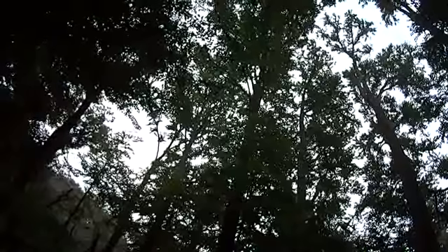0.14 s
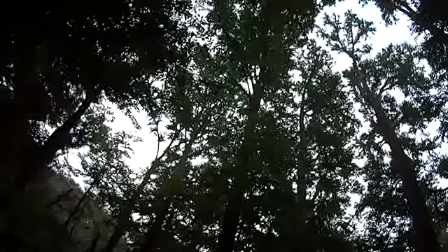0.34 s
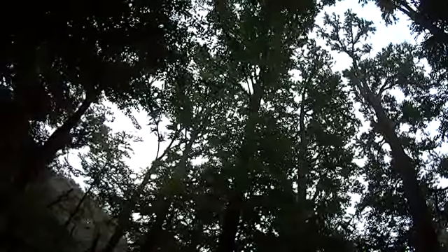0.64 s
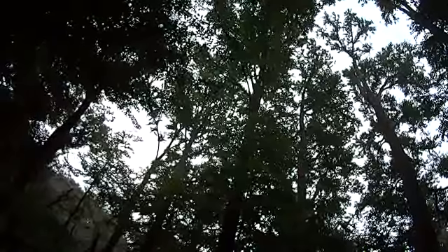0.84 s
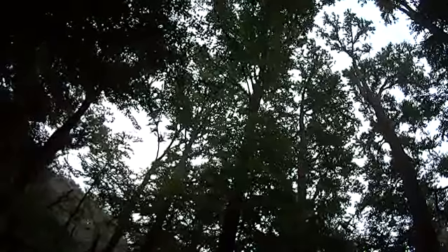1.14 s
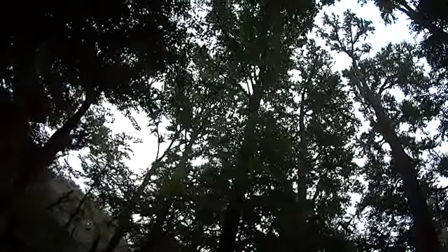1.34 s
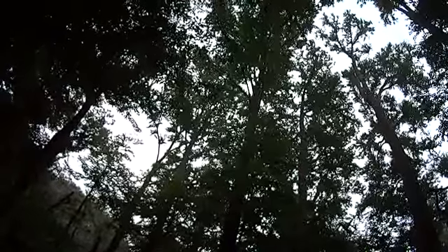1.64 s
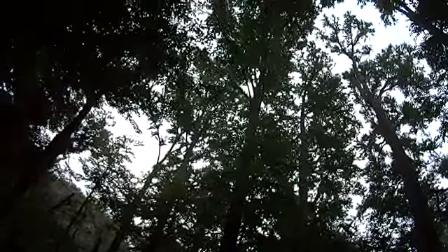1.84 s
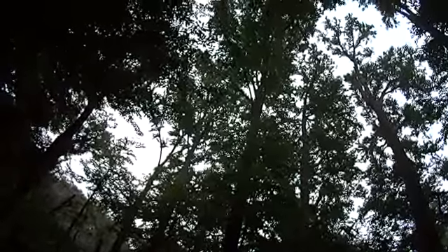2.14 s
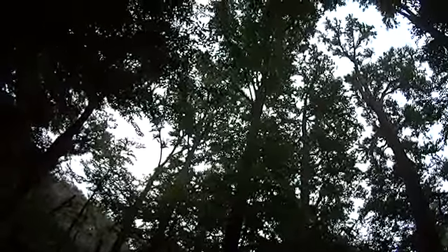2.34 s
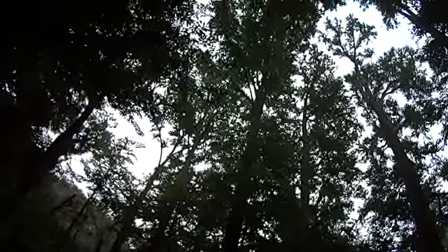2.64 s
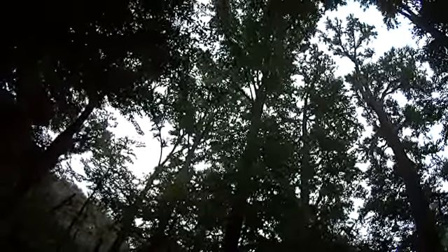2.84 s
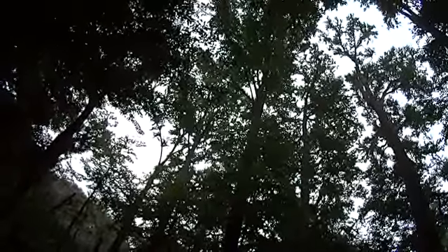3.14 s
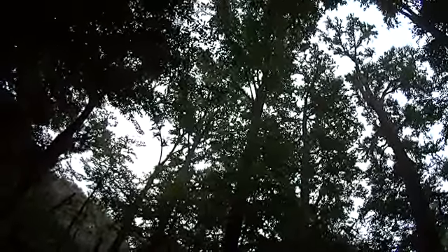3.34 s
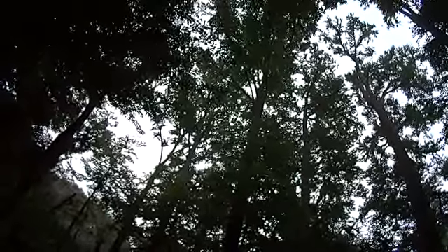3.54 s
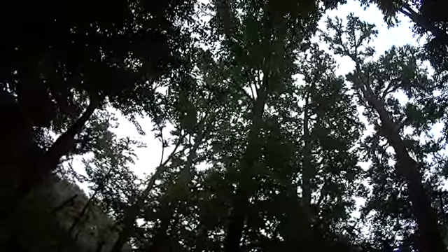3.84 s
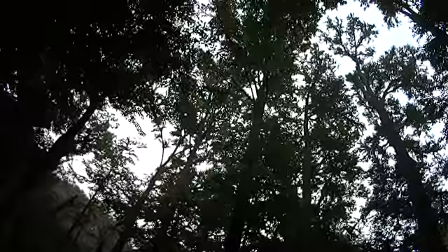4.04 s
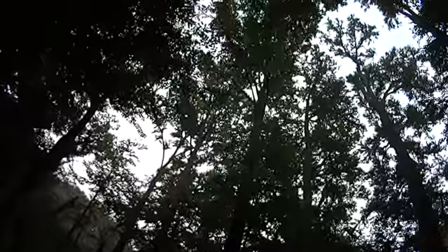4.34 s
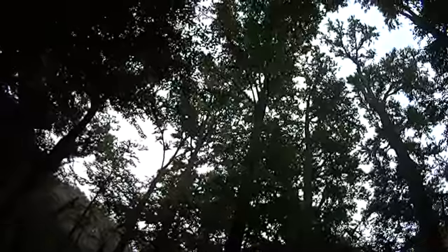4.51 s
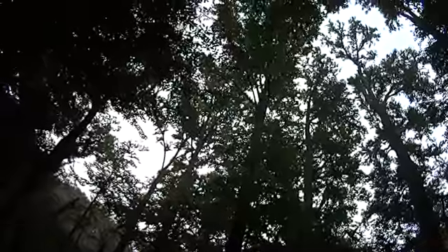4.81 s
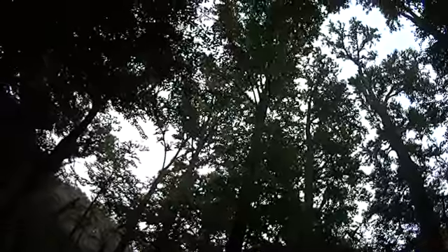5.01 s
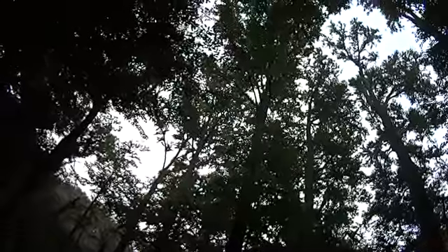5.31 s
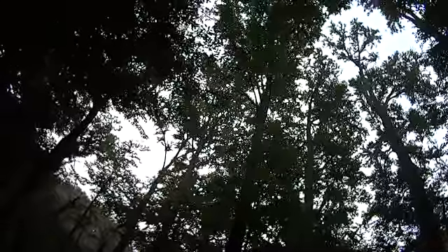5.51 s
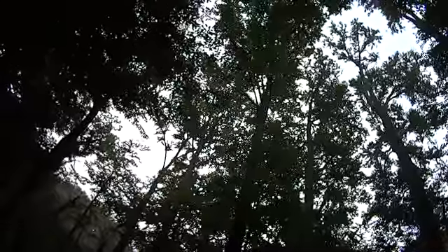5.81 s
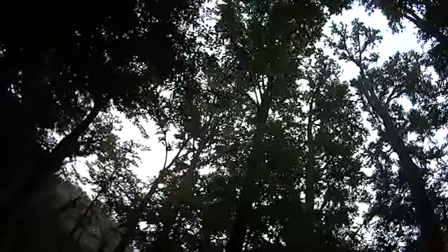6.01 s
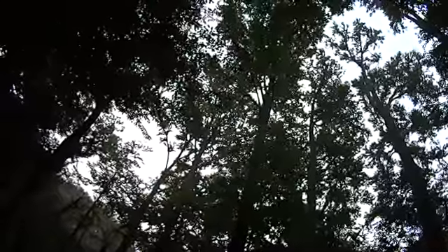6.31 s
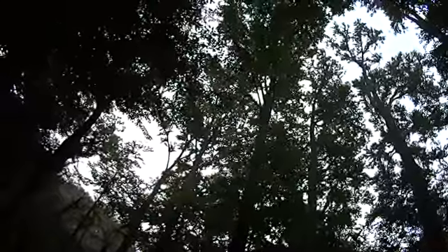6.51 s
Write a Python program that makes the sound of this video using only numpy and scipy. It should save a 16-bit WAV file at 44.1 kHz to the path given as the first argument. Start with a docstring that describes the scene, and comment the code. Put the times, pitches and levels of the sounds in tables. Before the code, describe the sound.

Short harsh woodpecker chirps echo through a wood, with faint arched notes from another bird, an insect drone and far traffic rumble.

```python
"""Distant traffic, a wavering hum and an insect chorus fill a wood; two dull thumps and a twig tick sound.
High in the trees a small bird or squirrel scolds in harsh chirps, slowly, then in a quick burst: an uneven
vibration filtered by throat and beak. Farther off a larger bird calls in arched notes, and two nearer
notes follow on the left. One cricket peeps faintly. Leaves shade the direct sound of the chirps, and the
trunks throw back every chirp and note."""
import sys
import numpy as np
from scipy import signal
from scipy.fft import rfft, irfft
from scipy.io import wavfile
from scipy.ndimage import uniform_filter1d

SR = 44100
rng = np.random.default_rng(int(sys.argv[2]) if len(sys.argv) > 2 else 0)


def log_audio(samples):
    """Write samples as a 16-bit WAV file to the path given in sys.argv[1]."""
    # one column per channel
    frames = np.atleast_2d(samples).T
    # limit to full scale, then quantise
    limited = np.clip(frames, -1, 1)
    pcm = np.round(limited * 32767).astype(np.int16)
    wavfile.write(sys.argv[1], SR, pcm)


N = 293706


def amp(db):
    """Amplitude ratio of a level in decibels."""
    return 10 ** (np.asarray(db) / 20)


def unit_rms(x):
    """Normalisation to an rms of 1."""
    return x / np.sqrt(np.mean(x ** 2) + 1e-20)


def spectrum_at(points, hz):
    """Interpolation of a spectrum along a logarithmic frequency axis."""
    f, value = np.transpose(points)
    return np.interp(np.log(hz + 1), np.log(f + 1), value)


def follow(rows):
    """Linear interpolation of timed columns at every sample."""
    times, *columns = np.transpose(rows)
    return [np.interp(np.arange(N) / SR, times, column) for column in columns]


def add(mix, start_s, sound):
    """Superposition: a sound adds to the mix from start_s on."""
    at = round(start_s * SR)
    part = mix[..., at:at + sound.shape[-1]]
    part += sound[..., :part.shape[-1]]


def pan(left_db):
    """Two gains whose level difference places a sound to one side."""
    return amp(np.array([[left_db / 2], [-left_db / 2]]))


def wander(count, hz):
    """Random fluctuation of rms 1: noise low-passed at hz."""
    b, a = signal.butter(2, hz / (SR / 2))
    return unit_rms(signal.lfilter(b, a, rng.standard_normal(count + 4000))[4000:])


def resonance(hz, centre_hz, width_hz):
    """Lorentzian response: the gain halves at half a width from the centre."""
    return 1 / (1 + ((hz - centre_hz) / (width_hz / 2)) ** 2)


def stereo_noise(level_db, coherence, left_db, patchy_db):
    """Partly coherent noise in two channels, its spectrum rippled by drifting patches."""
    frames, hz = N // 512 + 5, np.fft.rfftfreq(2048, 1 / SR)
    a, b, c, d, patches = rng.standard_normal((frames, len(hz), 5)).T
    patches = unit_rms(uniform_filter1d(uniform_filter1d(patches, size=16, axis=0), size=8, axis=1))
    alike = coherence(hz)[:, None]
    left = a + 1j * b
    right = alike * left + np.sqrt(1 - alike ** 2) * (c + 1j * d)
    colour = amp(level_db(hz)[:, None] + patchy_db * patches)
    balance = amp(np.array([[.5], [-.5]]) * left_db(hz))[..., None]
    spectra = np.array([left, right]) * colour * balance
    return unit_rms(signal.istft(spectra, nperseg=2048, noverlap=1536)[1][:, :N])


def traffic():
    """Broadband noise of a distant road, louder on the left and most coherent in the bass."""
    # relative spectral density: frequency_hz, level_db
    density = [(20, -22), (45, -6.5), (70, 1), (130, -1.5), (200, -6), (320, -10.5), (600, -10.5),
               (1200, -11), (2000, -19), (3300, -23.5), (6000, -31.5), (10000, -35.5), (12000, -42)]
    # likeness of left and right: frequency_hz, coherence
    coherence = [(60, .998), (130, .98), (270, .85), (570, .62), (1200, .35), (2600, .15), (4000, .3),
                 (11000, .35)]
    # excess of left over right: frequency_hz, level_db
    balance = [(60, .2), (190, .5), (350, 1.5), (620, 4), (1120, 5.5), (2000, 5), (3600, 1.5), (11000, .5)]
    # swell of the road: time_s, level_db
    swell = [(0, -39.5), (1, -40), (1.26, -36.5), (1.45, -38.5), (3, -39), (5.5, -40), (5.9, -39.5),
             (6.3, -41.2), (6.66, -40.5)]
    wash = stereo_noise(lambda hz: spectrum_at(density, hz), lambda hz: spectrum_at(coherence, hz),
                        lambda hz: spectrum_at(balance, hz), patchy_db=0.9)
    return amp(follow(swell)[0]) * wash


def hum():
    """A low engine-like tone wavers by random frequency and amplitude modulation."""
    # slow course of the tone: time_s, pitch_hz, level_db
    course = [(0, 57.2, -45.5), (.7, 57, -44), (1.2, 59.7, -39.5), (2.5, 61, -41), (3.2, 60.2, -46),
              (4.1, 60.6, -58), (5.2, 60.1, -46.5), (5.9, 60.4, -45), (6.3, 59.8, -47), (6.66, 59.6, -46)]
    hz, db = follow(course)
    cycles = np.cumsum(hz * (1 + 0.0149 * wander(N, 4))) / SR
    return np.sqrt(2) * amp(db + 1.44 * wander(N, 3.6)) * np.sin(2 * np.pi * cycles)


def insect_chorus():
    """Many far insects sum incoherently into one bell-shaped band of noise."""
    # swell of the chorus: time_s, level_db
    swell = [(0, -48), (.7, -48), (1.1, -46.5), (3.7, -47.5), (4.75, -45), (5.1, -46), (6.66, -48)]
    centre_hz, half_width_hz = 4635, 460
    band = stereo_noise(lambda hz: np.maximum(-12 * ((hz - centre_hz) / half_width_hz) ** 2, -60),
                        coherence=lambda hz: np.full_like(hz, .83), left_db=lambda hz: .3, patchy_db=.3)
    return amp(follow(swell)[0]) * band


def thumps():
    """Three hollow resonances swell briefly, made noisy by random amplitude modulation."""
    # dull thumps: start_s, level_db, length_s
    events = [(.004, -47, 0.063), (0.294, -45.5, 0.039)]
    # hollow resonances: frequency_hz, level_db
    hollow_modes = [(560, 0.5), (960, -2), (1350, -12)]
    out = np.zeros(N)
    for start_s, db, length_s in events:
        t = np.arange(round(length_s * SR)) / SR
        ringing = np.zeros(len(t))
        for hz, mode_db in hollow_modes:
            flutter = 1 + 1.25 * wander(len(t), 50)
            ringing += amp(mode_db) * flutter * np.sin(2 * np.pi * (hz * t + rng.random()))
        add(out, start_s, amp(db) * ringing * signal.windows.tukey(len(t), .4))
    return out


def twig_tick(t60_s=.006):
    """A twig ticks as one heavily damped mode."""
    # faint tick: start_s, level_db, pitch_hz
    events = [(0.1635, -37, 5950)]
    out = np.zeros(N)
    t = np.arange(300) / SR
    for start_s, db, hz in events:
        add(out, start_s, amp(db - 60 * t / t60_s) * np.sin(2 * np.pi * hz * t))
    return out


def chirp(db, top_hz, length_s, rise_s, end_ratio, others_db, roughness, tilt_db):
    """Source and filter: a rough pitch arch, led by every fourth partial, excites throat and beak."""
    # resonances of the open beak: centre_hz, width_hz, gain_db
    beak_modes = [(1580, 400, -17), (3200, 420, 0), (4020, 500, -14), (5700, 600, -8), (6400, 600, -10),
                  (8000, 1200, -19), (9400, 1300, -15)]
    t = np.arange(round(length_s * SR)) / SR
    progress = t / length_s
    scoop = 17.4 * rise_s * np.exp(-t / (0.00297 + 0.451 * rise_s))  # a slow rise starts lower
    pitch = top_hz * (1 - scoop - (1 - end_ratio) * progress ** 2.2)
    cycles = np.cumsum(pitch * (1 + 0.068 * roughness * wander(len(t), 350))) / SR
    throat_hz = 2590 - 540 * progress  # the throat lengthens
    throat_gain = amp(-5 + 3.5 * progress)
    shut_db = -2 + 34 * (1 - end_ratio)  # the further the pitch falls, the more the beak shuts
    beak_gain = amp(-shut_db * progress ** 2)
    joined = 1 - np.exp(-t / 0.0014)  # the other partials join as the vibration turns uneven
    effort = 1 - np.exp(-t / rise_s)
    voice = np.zeros(len(t))
    for k in range(2, 15):
        flutter = np.clip(roughness * (1.09 + k / 9), 0, 1)  # turbulence shakes high partials most
        shake = 1 - flutter + 0.7 * flutter * wander(len(t), 310)
        weight = 1 if k % 4 == 0 else joined * amp(-0.9 if k == 2 else others_db)
        beak = 0.091 + sum(amp(gain_db) * resonance(k * pitch, hz, width_hz)
                           for hz, width_hz, gain_db in beak_modes)
        tract = throat_gain * resonance(k * pitch, throat_hz, width_hz=750) + beak_gain * beak
        # high partials come with full effort and fade first
        slope = amp(tilt_db * np.log2(k / 4) - 0.36 * k * progress) * effort ** (0.1 * k)
        voice += weight * shake * tract * slope * np.cos(2 * np.pi * (k * cycles + rng.random()))
    # air rushing through the throat
    squeak = wander(len(t), 200) * np.cos(2 * np.pi * np.cumsum(throat_hz) / SR)
    release = np.sqrt(np.clip((1 - progress) / 0.28, 0, 1))
    envelope = effort ** 0.26 * amp(-9 * (progress - .3) ** 2) * release
    return amp(db) * envelope * (unit_rms(voice) + amp(-8.5 + .6 * others_db) * squeak)


def leaf_shade(sound, shade_db, corner_hz=4800):
    """Foliage attenuates the direct sound, by up to 3.5 times as many decibels in the treble."""
    hz = np.fft.rfftfreq(sound.shape[1], 1 / SR)
    gain_db = shade_db * (1 + 2.5 / (1 + (corner_hz / (hz + 1)) ** 4))
    return irfft(rfft(sound) * amp(gain_db), sound.shape[1])


def trunk_echoes(sound, onset_s, stretch, coherence):
    """Scattering off many trunks: sparse reflections of random sign, each band at its own decay rate."""
    # reverberation of the wood before stretching: frequency_hz, t60_s
    decay_times = [(1000, 0.49), (2200, 0.41), (3200, 0.67), (6000, 0.72), (10000, 0.47)]
    taps = np.zeros((3, SR))  # left, right, common to both
    at = np.arange(0, SR - 40, 40) + rng.integers(0, 40, (3, (SR - 1) // 40))
    np.put_along_axis(taps, at, rng.standard_normal(at.shape), 1)
    taps = np.sqrt(coherence) * taps[2] + np.sqrt(1 - coherence) * taps[:2]
    hz, t, spectra = signal.stft(taps, SR, nperseg=128)
    build_up = 1 - np.exp(-t / onset_s)  # the nearest trunks answer first, then more join
    decay = amp(-60 * t / (stretch * spectrum_at(decay_times, hz))[:, None])
    response = signal.istft(spectra * build_up * decay, SR, nperseg=128)[1]
    return signal.fftconvolve(sound, response / np.linalg.norm(response[0]), axes=1)[:, :N]


def scolding():
    """Multipath propagation: chirps arrive through the leaves, then as early and late reflections."""
    # harsh chirps: start_s, level_db, top_hz, length_s, rise_s, end_pitch_ratio, other_partials_db,
    # roughness, tilt_db_per_octave, shade_db
    chirps = [ (0.35, -32, 769, 0.043, 0.0071, .94, -1, 0.26, -0.5, -1),
              (1.088, -29, 797, 0.037, 0.0042, 0.85, -3, 0.24, 3, -0.5),
              (2.013, -31.5, 782.4, 0.041, 0.0057, 0.81, -3.5, 0.27, 0, -2.5),
              (2.784, -34, 762, 0.044, 0.0055, 0.92, -1, 0.25, 0, -1.5),
              (3.833, -30.5, 795, 0.045, 0.0053, 0.77, -1.7, 0.23, 2.5, -0.5),
              (4.196, -27.5, 810, 0.046, 0.0014, 0.82, -1, 0.33, 2, -0.5),
              (4.39, -25.5, 808.5, 0.037, 0.0011, 0.87, -0.5, 0.27, 1.5, -0.4),
              (4.529, -25.5, 805, 0.039, 0.0011, .75, -1, 0.25, 3, -0.8),
              (4.619, -23, 824.5, 0.0357, .0035, .94, 0.8, 0.16, 2.5, -0.1),
              (4.743, -25, 807, 0.038, 0.00492, .9, -2, 0.25, 2.5, -0.2),
              (4.829, -26, 812, 0.046, 0.0012, .9, 0.2, 0.21, 2, -.6),
              (5.248, -33, 816, 0.058, 0.012, 0.96, -2, 0.55, 0, -3.5),
              (5.743, -30.5, 769, 0.045, 0.0082, 1.035, -7.5, 0.23, 2.5, -4),
              (6.32, -30.5, 752, 0.056, 0.012, 1.03, -10, 0.26, 2, -3.5), ]
    emitted, direct = np.zeros((2, 2, N))
    for start_s, *voicing, shade_db in chirps:
        sound = pan(-0.5) * chirp(*voicing)
        add(emitted, start_s, sound)
        add(direct, start_s, leaf_shade(sound, shade_db))
    early = trunk_echoes(emitted, onset_s=0.00063, stretch=0.35, coherence=0.78)
    late = trunk_echoes(emitted, onset_s=0.015, stretch=1.45, coherence=0.46)
    return direct + amp(-4) * early + amp(-6.5) * late


def arched_note(length_s, top_hz, sag, db, fourth_db, apex, linger, start_db, end_db, waver_db, jitter):
    """Third and fourth harmonics of a gliding fundamental; pitch and level arch together."""
    progress = np.linspace(0, 1, round(length_s * SR))
    from_apex = np.where(progress < apex, 1 - progress / apex, (progress - apex) / (1 - apex))
    droop = from_apex ** 2 * (1 + 2 * linger * (1 - from_apex))  # lingering flattens both ends
    pitch = top_hz * (1 - sag * droop) * (1 + jitter * wander(len(progress), 30))
    phase = 2 * np.pi * np.cumsum(pitch) / SR
    voice = np.sin(3 * phase) + amp(fourth_db) * np.sin(4 * phase)
    arch_db = np.where(progress < apex, start_db, end_db) * droop
    level = amp(db + arch_db + waver_db * wander(len(progress), 27))
    return np.sqrt(2) * level * voice * signal.windows.tukey(len(progress), .1)


def far_bird():
    """A larger bird calls from deep in the wood, where reverberation outweighs the direct sound."""
    # far notes: start_s, length_s, top_hz, pitch_sag_fraction, third_partial_db
    notes = [(1.042, 0.21, 457, 0.17, -41.5), (1.579, .16, 428.6, 0.13, -37.5),
             (2.143, .17, 429.3, .11, -37), (2.732, .24, 442, .13, -39.5), (3.421, 0.15, 425, 0.11, -38.5)]
    direct = np.zeros((2, N))
    for start_s, *voicing in notes:
        add(direct, start_s, arched_note(*voicing, fourth_db=-19, apex=.55, linger=0.98,
                                         start_db=-3, end_db=-8, waver_db=2.6, jitter=0.012))
    echoes = trunk_echoes(direct, onset_s=0.007, stretch=2.65, coherence=0.51)
    return amp(-1) * direct + amp(2.5) * pan(1.6) * echoes


def cricket():
    """A faint cricket peeps in short, nearly pure tones that sweep downward."""
    # peeps: start_s, level_db
    peeps = [(3.685, -61), (5.183, -67), (5.69, -63), (6.205, -66)]
    t = np.arange(round(0.051 * SR)) / SR
    pitch_hz = 5830 - 4000 * t
    peep = np.sqrt(2) * np.hanning(len(t)) * np.sin(2 * np.pi * np.cumsum(pitch_hz) / SR)
    out = np.zeros(N)
    for start_s, db in peeps:
        add(out, start_s, amp(db) * peep)
    return out


def left_bird():
    """Nearer notes on the left have a higher ratio of direct to reverberant sound."""
    # nearer notes: start_s, length_s, top_hz, pitch_sag_fraction, third_partial_db
    notes = [(5.63, .2, 399.3, .21, -46), (6.524, 0.184, 408, 0.21, -47)]
    direct = np.zeros((2, N))
    for start_s, *voicing in notes:
        add(direct, start_s, arched_note(*voicing, fourth_db=1.7, apex=0.385, linger=0.13,
                                         start_db=-2, end_db=-4.5, waver_db=1.5, jitter=0.011))
    echoes = trunk_echoes(direct, onset_s=0.016, stretch=2.0, coherence=0.42)
    return pan(10) * (direct + amp(-1) * echoes)


def scene():
    """Superposition of the steady background and the brief sounds of the wood."""
    background = traffic() + hum() + insect_chorus()
    return background + thumps() + twig_tick() + scolding() + far_bird() + cricket() + left_bird()


def record(dry):
    """A linear-phase low-pass filter removes the highest treble."""
    cutoff_hz = 11100
    kernel = signal.firwin(401, cutoff_hz, window=("kaiser", 9), fs=SR)
    return signal.oaconvolve(dry, kernel[None], "same")


dry = scene()
out = record(dry)
log_audio(out)
```